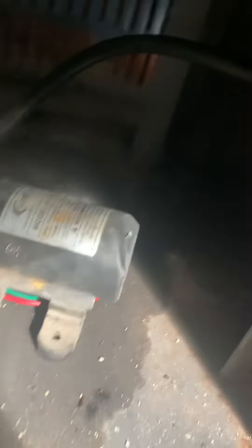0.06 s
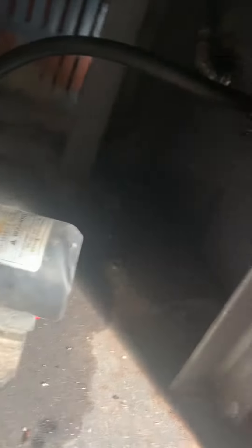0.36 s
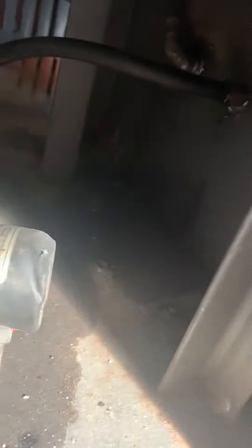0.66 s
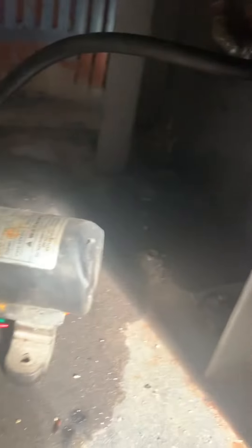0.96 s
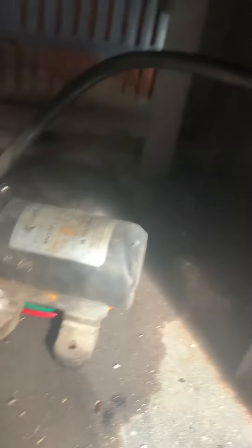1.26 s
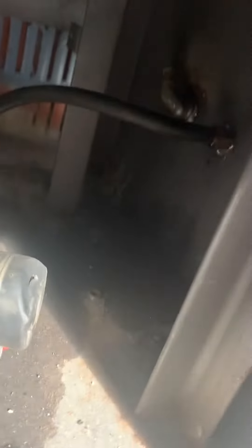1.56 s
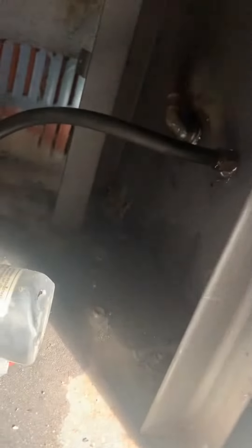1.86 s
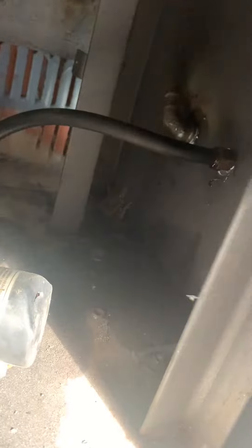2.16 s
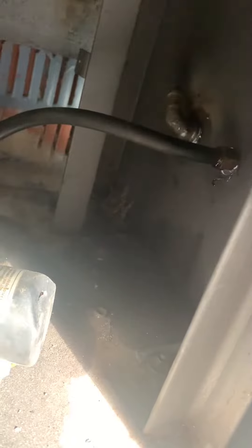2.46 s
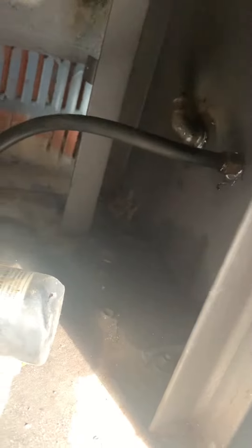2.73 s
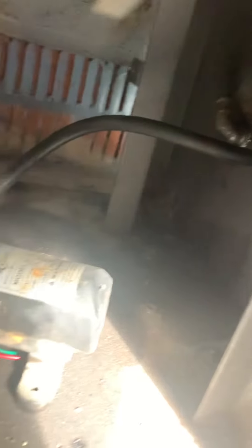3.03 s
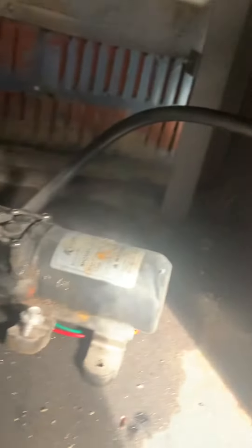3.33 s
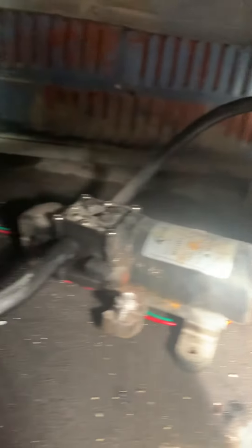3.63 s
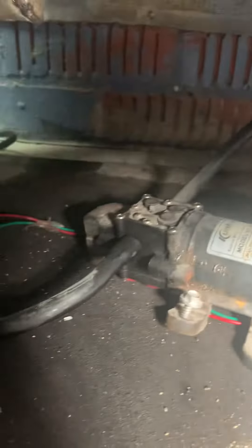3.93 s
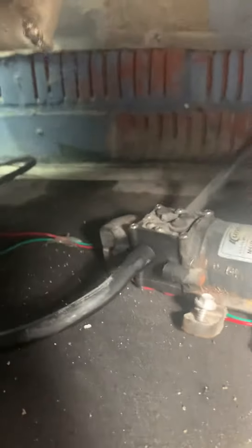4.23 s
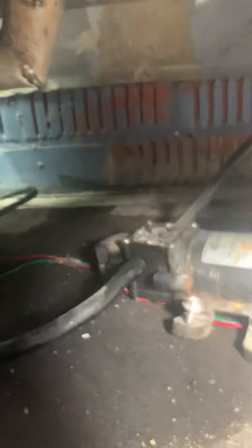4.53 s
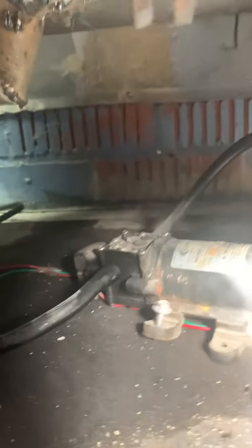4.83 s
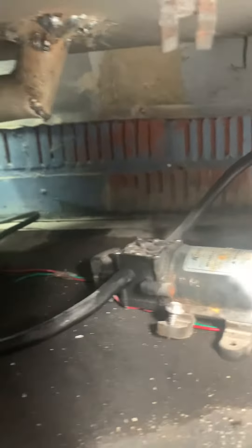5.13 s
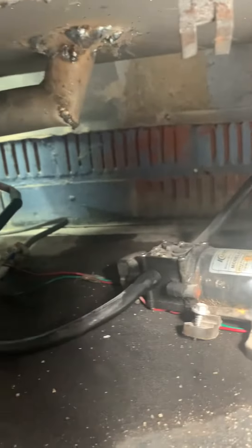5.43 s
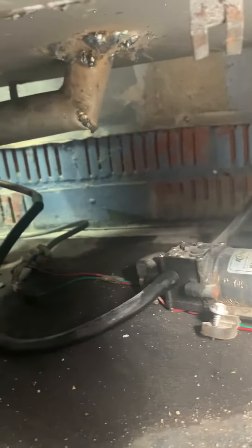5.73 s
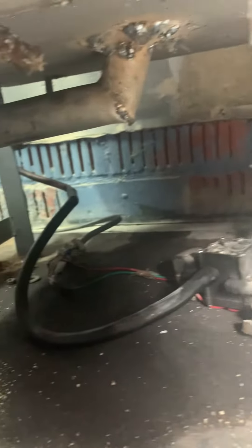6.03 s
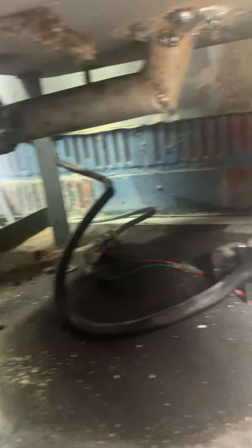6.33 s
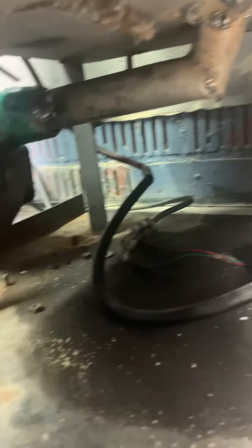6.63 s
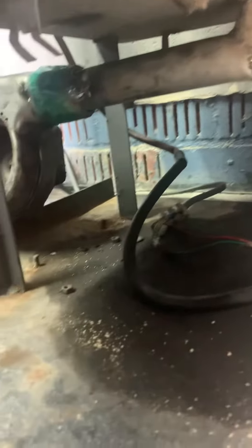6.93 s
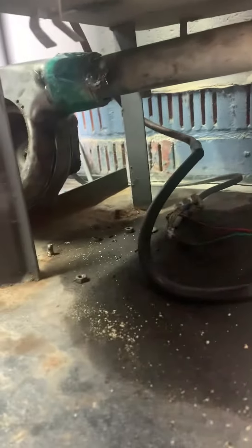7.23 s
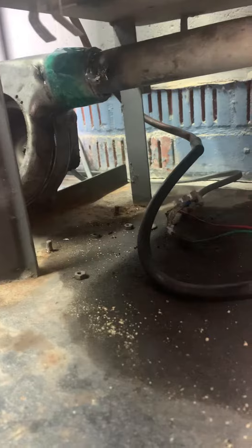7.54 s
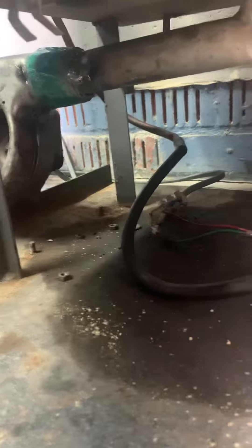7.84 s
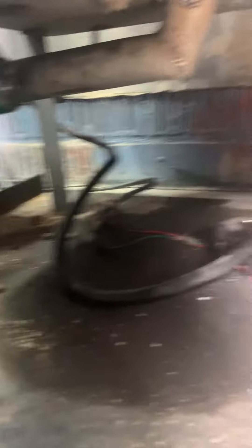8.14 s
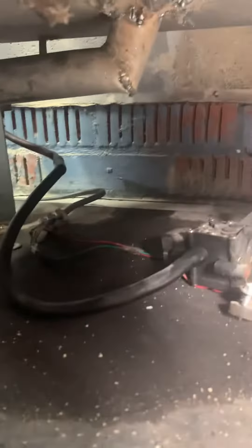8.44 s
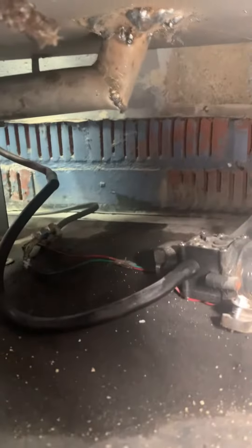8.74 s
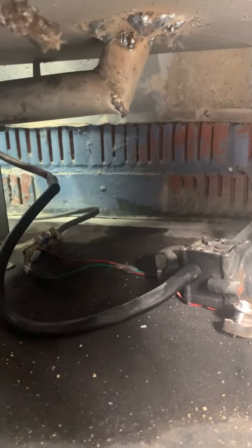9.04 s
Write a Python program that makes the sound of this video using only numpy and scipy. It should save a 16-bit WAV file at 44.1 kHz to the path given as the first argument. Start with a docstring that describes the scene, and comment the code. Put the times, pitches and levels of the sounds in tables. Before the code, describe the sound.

Deep, even burner roar and hissing forced air in a garage, with a faint high whistle and one brief gritty scuff.

```python
"""A low flame roar and rushing air: an oil burner runs in a garage, close by.
The flame drives the firebox resonances and flares now and then. The fan rushes and hisses through its
duct, and air whistles thinly at a gap. As the listener moves from the motor towards the feed pipe, the
colour shifts and bands of ringing and hiss come and go. Once something scuffs on the gritty floor."""
import sys
import numpy as np
from scipy import signal
from scipy.fft import rfft, irfft, next_fast_len
from scipy.io import wavfile
from scipy.ndimage import uniform_filter1d

SR = 44100
rng = np.random.default_rng(int(sys.argv[2]) if len(sys.argv) > 2 else 0)


def generate_wav(sig):
    """Save sig (samples, or channels by samples) to the path in sys.argv[1] as 16-bit PCM at SR."""
    pcm = np.round(np.clip(np.atleast_2d(sig).T, -1, 1) * 32767).astype(np.int16)
    wavfile.write(sys.argv[1], SR, pcm)


N = 405279
TIME_S = np.arange(N) / SR
FFT_SIZE = next_fast_len(N, real=True)
FREQ_HZ = np.maximum(np.arange(FFT_SIZE // 2 + 1) * SR / FFT_SIZE, 1)
SIDES = np.array([[1], [-1]])   # left, right
MOTOR, PIPE = 1, 2   # columns of the two-place tables


# Firebox resonances: (frequency [Hz], width [Hz], relative level [dB])
FIREBOX_MODES = [(48.6, 20, -2.5), (55.7, 17, 4), (82, 52, -4), (108.1, 26, 0.5), (129.5, 19.2, 0.5),
                 (162.4, 16, -5), (184, 32, -15.5), (238.4, 58, -14.5)]
# Flare-ups: (peak time [s], half length [s], roar lift [dB], boom lift [dB])
FLARE_UPS = [(0.97, 0.13, 3, 2), (1.37, 0.19, 3, 4), (1.99, 0.2, 2.5, 2), (2.706, .12, 0.5, 6.5),
             (4.506, 0.18, 4.5, 3), (8.004, 0.077, 6, 6), (8.712, .1, 2.5, 2)]


def flame(roar_db=-30.5, boom_db=-36, roar_drop_db=1, boom_drop_db=1.1, split_hz=73):
    """The flame drives the firebox: a deep boom and a roar, lifted by flares, weaker by the pipe."""
    power = sum(from_db(db) ** 2 * bell(hz, width) ** 2 for hz, width, db in FIREBOX_MODES)
    firebox = np.sqrt(power) * highpass(36, order=2) * lowpass(262, order=12)
    boom_level_db = boom_db - boom_drop_db * position()
    roar_level_db = roar_db - roar_drop_db * position()
    for peak_s, half_s, roar_lift_db, boom_lift_db in FLARE_UPS:
        flare = np.exp(-((TIME_S - peak_s) / half_s) ** 2)
        boom_level_db += boom_lift_db * flare
        roar_level_db += roar_lift_db * flare
    boom = levelled_noise(firebox * lowpass(split_hz, order=8), boom_level_db)
    roar = levelled_noise(firebox * highpass(split_hz, order=8), roar_level_db)
    return boom + roar


# Forced air: (time [s], rush before trim [dB], hiss before trim [dB])
FAN_LEVELS = [(0, -31.7, -47), (1.1, -31.1, -46.5), (1.7, -31.7, -47.7), (2.8, -31.2, -47.5),
              (3.6, -30.7, -46.5), (4.15, -31.2, -46.5), (4.55, -29.3, -46.3), (4.9, -31.2, -46.3),
              (5.25, -33.6, -46.5), (6.3, -32.9, -46.5), (7.5, -32.2, -46.6), (9.19, -30.7, -46)]


def fan(rush_trim_db=.5, hiss_trim_db=-1.5, flutter_db=.45, sputter_db=.3, split_hz=2060):
    """Air rushes through the duct and hisses at its edges, both fluttering a little."""
    rush_db, hiss_db = time_curves(FAN_LEVELS)
    rush_band = highpass(272, order=14) * lowpass(split_hz, order=8)
    rush, hiss = [], []
    for place in (MOTOR, PIPE):
        colour = duct_colour(place)
        rush.append(unit_rms(stereo_noise(colour * rush_band, place)))
        hiss.append(unit_rms(stereo_noise(colour * highpass(split_hz, order=8), place)))
    rush_gain = from_db(rush_db + rush_trim_db + flutter_db * drift(rate_hz=22))
    echoed_hiss = early_echoes(walk(*hiss))
    hiss_gain = from_db(hiss_db + hiss_trim_db + sputter_db * drift(rate_hz=25))
    return walk(*rush) * rush_gain + echoed_hiss * hiss_gain


# Relative air noise density: (frequency [Hz], by motor [dB], by pipe [dB])
AIR_SPECTRUM = [(270, -16, -15), (310, 0, -1.5), (500, -6.5, -8.5), (700, -5, -8), (930, -7.5, -10.5),
                (1130, -14, -15.3), (1800, -14.5, -13), (2200, -23, -22.5), (4000, -26, -23.5),
                (4700, -25.5, -26), (5300, -28.5, -27.3), (7400, -31.5, -28.5), (8300, -27.8, -27.2),
                (9500, -32.5, -31), (11000, -37.3, -36.5), (12600, -39, -38), (15000, -45, -45.5)]
# Duct and housing resonances: (frequency [Hz], width [Hz], lift by motor [dB], lift by pipe [dB])
DUCT_MODES = [(311.9, 19.7, 9.5, 9), (349, 64, 1, 2.4), (414.2, 59, 9.5, 5.5), (447, 23.6, 8, 6),
              (574, 45, 7, 7), (622, 23, -0.2, 4.5), (689.4, 60, 7, 7), (747, 17, 4.5, 2),
              (811.6, 26, 8, -2.5), (881, 20, 3.5, 8), (955, 30, -5.5, 3), (1007, 44, 4.5, 6.5),
              (1042, 48, 8.5, 1.5), (1083, 45, -2, -3.5), (1206, 59, 0, 8.5), (1346, 34, 12, -5.5),
              (1503, 42, -5.2, 2.5), (1560, 51, 8.5, 2.5), (1688, 26, -1, 7.5), (1780, 37, -1, 3),
              (1855, 37, 7, 4.5), (1940, 64, 0.5, -9.5), (2070, 57, -8, 4.5), (6280, 940, 7, 3.5),
              (6650, 220, 4, 10), (10320, 580, 4, 5.5), (11600, 390, 5.5, 9.5)]
# Left minus right level: (frequency [Hz], by motor [dB], by pipe [dB])
AIR_BALANCE = [(250, 6, 0), (305, 3, .3), (432, 9.5, -0.55), (680, 12, 0.24), (850, 7, 1),
               (1080, 2.5, 0.49), (1300, 4, -1.1), (2200, -2.5, -0.63)]


def duct_colour(place):
    """Duct and housing colour the air noise: left and right gain at one place."""
    lift_db = sum(lifts_db[place - MOTOR] * bell(hz, width) for hz, width, *lifts_db in DUCT_MODES)
    pan = from_db(freq_curve(AIR_BALANCE, place) * SIDES / 2)
    pan /= np.sqrt(np.mean(pan ** 2, axis=0))
    return from_db(freq_curve(AIR_SPECTRUM, place) + lift_db) * pan


# Gap tones and hiss, relative levels: (frequency [Hz], width [Hz], by motor [dB], by pipe [dB])
GAP_TONES = [(6190, 12, -72, -68), (6520, 14, -59, -61), (6581, 9, -56.5, -48), (6608, 14, -59.5, -58),
             (6661, 14, -63.5, -58.5), (6768, 12, -68, -68), (6560, 280, -69.5, -67),
             (6950, 600, -77, -74.5)]
# Whistle swells: (time [s], level before trim [dB])
GAP_LEVELS = [(0.12, -45), (0.45, -49.5), (0.9, -47), (1.15, -52), (1.4, -46), (1.8, -60), (2.4, -57),
              (2.8, -49), (3.2, -53), (3.85, -42), (4.15, -48.5), (4.55, -45.5), (5.25, -42), (5.65, -43.5),
              (6.4, -45), (7.3, -44.5), (9.1, -46)]


def whistle(trim_db=-2):
    """Air whistles at a gap: close, unsteady tones beat in a band of hiss, swelling and fading."""
    level_db = time_curves(GAP_LEVELS)[0] + trim_db
    by_place = []
    for place in (MOTOR, PIPE):
        power = sum(from_db(levels_db[place - MOTOR]) ** 2 * bell(hz, width) ** 2
                    for hz, width, *levels_db in GAP_TONES)
        by_place.append(levelled_noise(np.sqrt(power), level_db, window_s=.11))
    return walk(*by_place)


# Bands along the walk: (frequency [Hz], width [Hz], level [dB], position [0-1], reach each way [0-1])
PASSING_BANDS = [(3396, 170, -50.5, .01, .075), (2604, 110, -50.5, 0.1, 0.03),
                 (3080, 400, -49.5, 0.47, 0.31), (3350, 510, -50, .28, 0.12),
                 (3420, 810, -49.5, 0.67, 0.31), (3390, 72, -53, .52, .16), (3385, 130, -54, 0.77, 0.5),
                 (3880, 410, -55, 1, .45), (5460, 410, -54.5, 0.57, 0.4), (7200, 700, -54, 0.48, 0.27),
                 (5783, 12, -60.5, .07, .15), (5840, 14, -65, .085, .1), (6280, 220, -55, 0.12, .075),
                 (14400, 1600, -66, 0.4, .3), (1210, 93, -46, .44, 0.22), (1770, 160, -52, 0.5, 0.1),
                 (1490, 80, -53, 0.52, 0.13), (83, 28, -36.5, 0.79, .15)]


def passing_bands(waver_db=1.8):
    """Ringing, hiss, thin whistle tones and a low flame swell waver and fade in and out on the walk."""
    out, along = 0, position()
    for hz, width, db, centre, reach in PASSING_BANDS:
        band = stereo_noise(bell(hz, width))
        nearness = 1 / (1 + ((along - centre) / reach) ** 4)
        out += band / rms(band) * nearness * from_db(db + waver_db * drift(rate_hz=3))
    return out


# Grit colour: (frequency [Hz], relative density [dB])
GRIT_SPECTRUM = [(2500, 3), (6000, 0), (9000, -3), (12000, -2), (15500, -3)]
# Scuff bursts: (onset [s], level [dB], 60 dB decay [s], lower edge [Hz], upper edge [Hz])
SCUFF_BURSTS = [(6.420, -35, .06, 6000, 13000), (6.426, -44, .2, 6000, 12500),
                (6.420, -39, .16, 3500, 7500), (6.499, -37, .1, 3500, 8500),
                (6.5164, -31.5, .032, 4000, 13500), (6.5243, -22.3, .017, 4300, 13000),
                (6.529, -40.5, .09, 4000, 11500), (6.526, -27.5, .08, 450, 2200),
                (6.540, -39, .1, 2500, 11000), (6.549, -26, .045, 300, 1000), (6.548, -23, .05, 70, 180)]


def scuff(grain_db=1.5, attack_s=.0005):
    """Grit crunches in short, grainy bursts, ending in a sharp snap, two dull knocks and a thud."""
    grit = stereo_noise(from_db(freq_curve(GRIT_SPECTRUM))) * from_db(grain_db * drift(rate_hz=400))
    out = 0
    for onset_s, db, decay_s, low_hz, high_hz in SCUFF_BURSTS:
        bandpass = signal.butter(2, [low_hz, high_hz], "band", fs=SR, output="sos")
        burst = signal.sosfilt(bandpass, grit)
        age_s = np.maximum(TIME_S - onset_s, 0)
        envelope = np.minimum(age_s / attack_s, 1) * from_db(db - 60 * age_s / decay_s)
        out += burst / rms(burst) * envelope
    return out


def floor_rub(peak_s=6.542, half_s=.04, level_db=-33.5):
    """The dull rub under the scuff swells and dies away."""
    rub = unit_rms(stereo_noise(highpass(380, order=2) * lowpass(1850, order=4)))
    return rub * from_db(level_db) * np.exp(-((TIME_S - peak_s) / half_s) ** 2)


def early_echoes(direct, total_db=-6, spread_s=.03, shift_s=.0012, sway_s=.00003, count=16):
    """Floor and steel frame reflect; the paths change as the listener walks and sways."""
    moved_s = shift_s * uniform_filter1d(position(), SR // 2) + sway_s * drift(rate_hz=.92)
    out = direct.copy()
    for lag, heading, polarity in rng.random((count, 3)):
        delay_s = (.1 + lag) * spread_s + np.cos(np.pi * heading) * moved_s
        index = np.round((TIME_S - delay_s) * SR).astype(int)
        echo = np.take(direct, index, axis=1, mode="wrap")
        out += echo * np.sign(polarity - .5) * from_db(total_db) / np.sqrt(count)
    return out


# Listener's path: (time [s], position [0-1])
LISTENER_PATH = [(0, 0.016), (.6, .01), (1.15, .095), (2.9, .085), (3.5, 0.28), (4.3, 0.64), (5.1, 0.98),
                 (9.19, 1)]


def position():
    """Listener's position over time: 0 by the motor, 1 by the pipe."""
    return time_curves(LISTENER_PATH)[0]


def walk(by_motor, by_pipe):
    """Equal-power blend of the two places along the path."""
    along = position()
    return np.sqrt(1 - along) * by_motor + np.sqrt(along) * by_pipe


# Likeness of left and right: (frequency [Hz], coherence [0-1])
STEREO_COHERENCE = [(60, .93), (320, .95), (600, .85), (1000, .75), (1500, .6), (2400, .72), (3500, .75),
                    (4200, .9), (4600, .997), (5000, .995), (5700, .82), (6600, .99), (7400, .98),
                    (8000, .88), (8600, .99), (9300, .995), (10000, .85), (11000, .97), (12100, .85),
                    (13000, .99), (15000, .85)]
# Phase lead of the left: (frequency [Hz], by motor [rad], by pipe [rad])
STEREO_PHASE = [(100, -.04, -.04), (400, -.35, -.35), (650, -1.2, -.3), (950, 1.6, .4), (1350, 1.4, .25),
                (1560, 1.7, .1), (1900, 2.5, 0), (2500, 3.1, 2.8), (3500, 1.8, 1.5), (4200, 2.35, 2.3),
                (4550, 3.05, 3.05), (5000, 3.25, 3.2), (6400, 6.2, 6.2), (7400, 6.5, 6.5), (8200, 8.3, 8.4),
                (8550, 9.35, 9.35), (9400, 9.5, 9.5), (10600, 12.5, 12.5), (11600, 12.7, 12.7),
                (12600, 15.5, 15.5), (13600, 15.9, 15.9), (14800, 18.8, 18.8)]


def stereo_noise(gain, place=MOTOR):
    """Coloured stereo noise whose left-right likeness and phase lead vary with frequency."""
    coherence = freq_curve(STEREO_COHERENCE)
    shape = (2, len(FREQ_HZ))
    mid, side = rng.standard_normal(shape) + 1j * rng.standard_normal(shape)
    channels = np.sqrt(1 + coherence) * mid + np.sqrt(1 - coherence) * side * SIDES
    lead = np.exp(.5j * SIDES * freq_curve(STEREO_PHASE, place))
    return irfft(channels * gain * lead, FFT_SIZE)[:, :N]


def levelled_noise(gain, level_db, window_s=.53):
    """Turbulent noise: flutters by chance while its running rms follows the given level."""
    noise = stereo_noise(gain)
    running_rms = np.sqrt(uniform_filter1d(noise.mean(axis=0) ** 2, int(window_s * SR)))
    return noise / running_rms * from_db(level_db)


def drift(rate_hz):
    """Low-passed random curve, rms 1."""
    spectrum = rfft(rng.standard_normal(FFT_SIZE)) * lowpass(rate_hz, order=2)
    curve = irfft(spectrum, FFT_SIZE)[:N]
    return curve / rms(curve)


def time_curves(rows):
    """Each value column over time."""
    times_s, *columns = np.transpose(rows)
    return [np.interp(TIME_S, times_s, column) for column in columns]


def freq_curve(rows, column=1):
    """One column over log frequency."""
    table = np.array(rows)
    return np.interp(np.log(FREQ_HZ), np.log(table[:, 0]), table[:, column])


def bell(hz, width_hz):
    """Resonance curve, peak 1."""
    return 1 / (1 + (2 * (FREQ_HZ - hz) / width_hz) ** 2)


def highpass(hz, order):
    return 1 / np.sqrt(1 + (hz / FREQ_HZ) ** (2 * order))


def lowpass(hz, order):
    return 1 / np.sqrt(1 + (FREQ_HZ / hz) ** (2 * order))


def from_db(db):
    return 10 ** (np.asarray(db) / 20)


def rms(x):
    return np.sqrt(np.mean(x ** 2) + 1e-20)


def unit_rms(stereo):
    """Scale to a mid-channel rms of 1."""
    return stereo / rms(stereo.mean(axis=0))


def scene(flame_pan_db=.8):
    """The burner and one scuff; the flame moves from slightly right to slightly left on the way."""
    left_minus_right_db = flame_pan_db * (position() - .5)
    flame_pan = from_db(left_minus_right_db * SIDES / 2)
    return flame() * flame_pan + fan() + passing_bands() + whistle() + scuff() + floor_rub()


def record(dry):
    """Steep cut of the top treble."""
    return irfft(rfft(dry, FFT_SIZE) * lowpass(15800, order=150), FFT_SIZE)[:, :N]


dry = scene()
out = record(dry)
generate_wav(out)
```